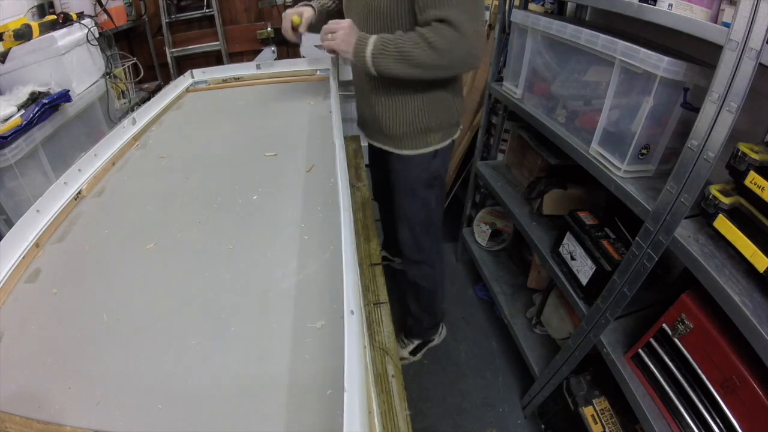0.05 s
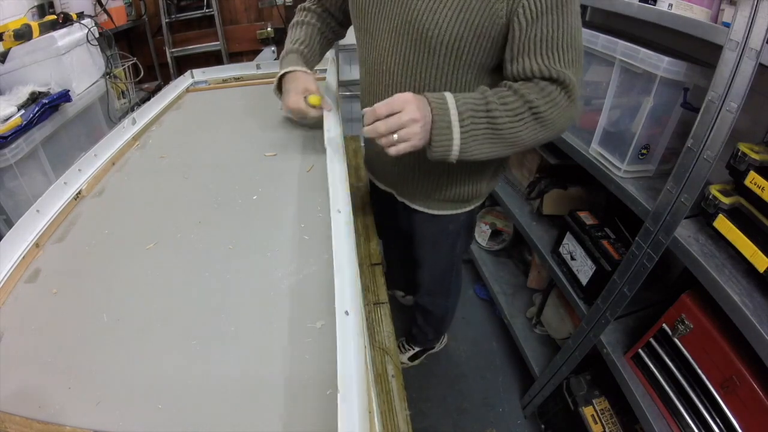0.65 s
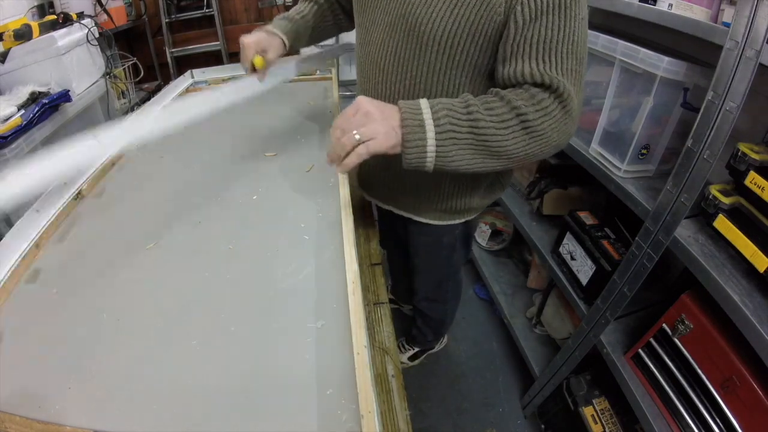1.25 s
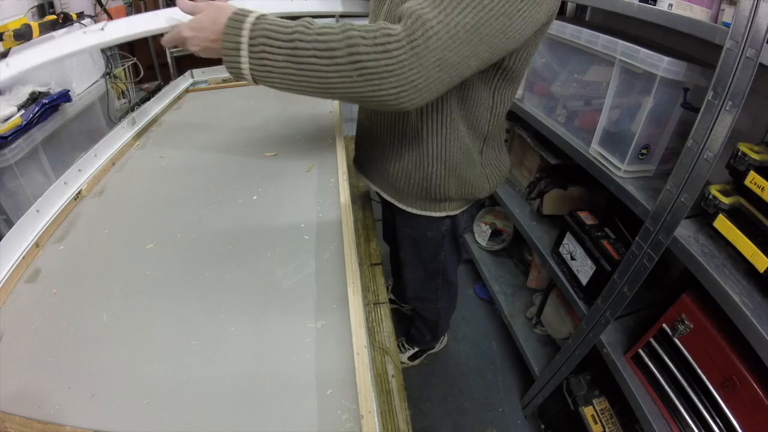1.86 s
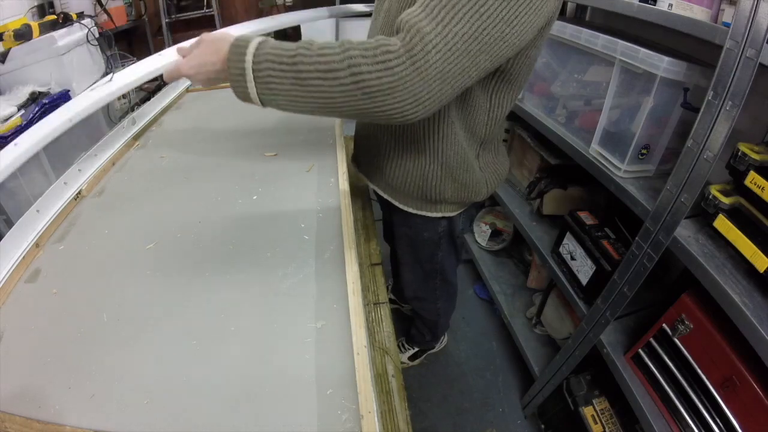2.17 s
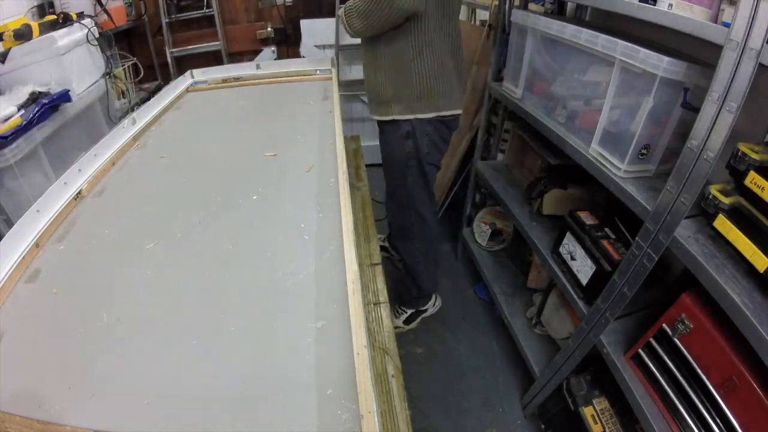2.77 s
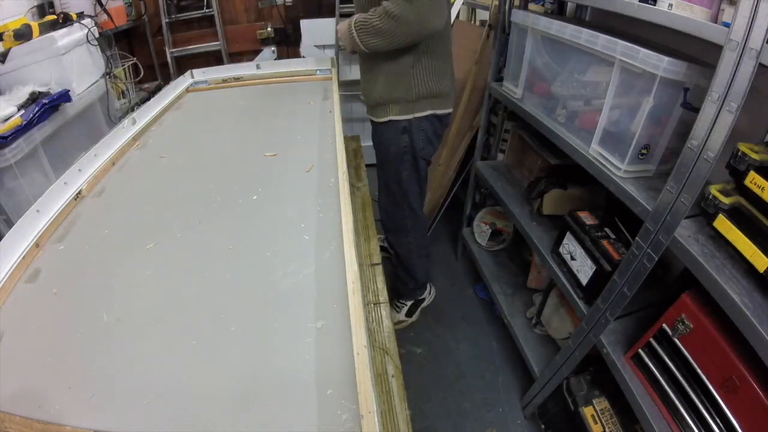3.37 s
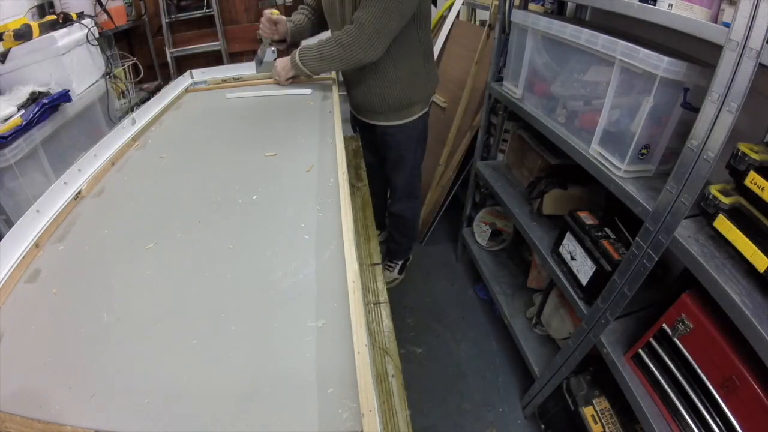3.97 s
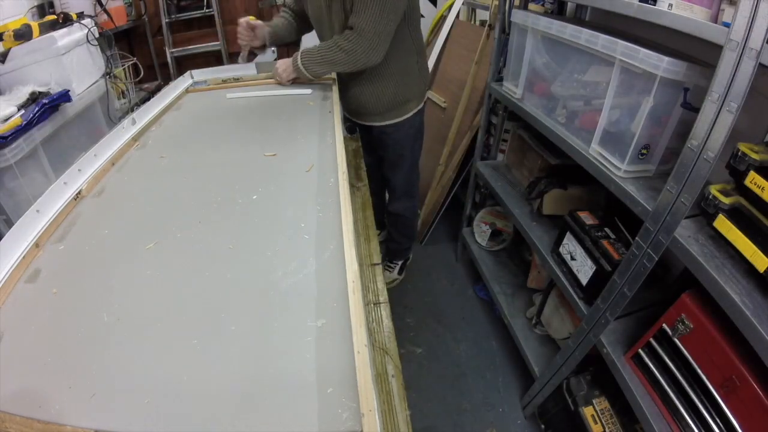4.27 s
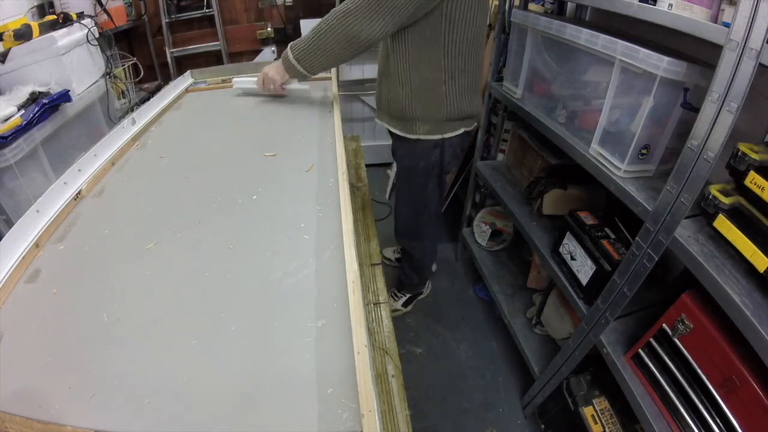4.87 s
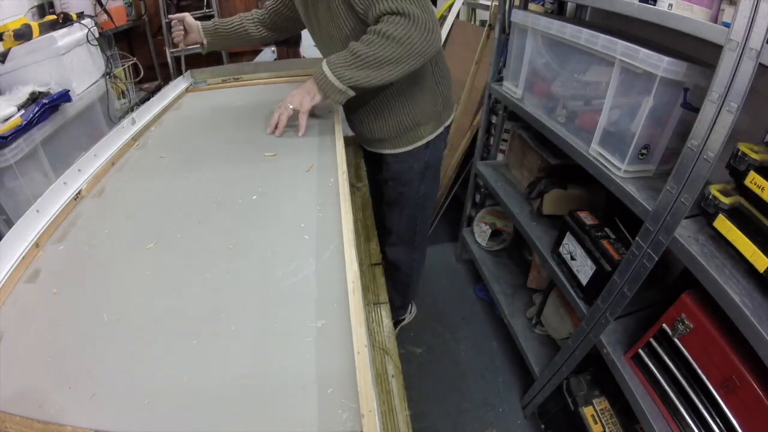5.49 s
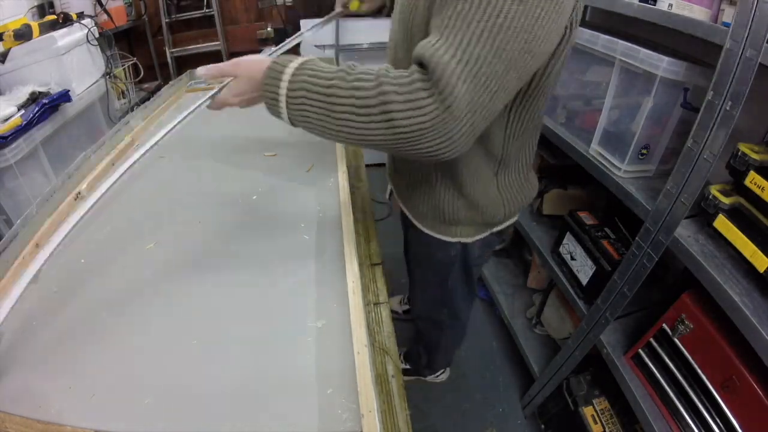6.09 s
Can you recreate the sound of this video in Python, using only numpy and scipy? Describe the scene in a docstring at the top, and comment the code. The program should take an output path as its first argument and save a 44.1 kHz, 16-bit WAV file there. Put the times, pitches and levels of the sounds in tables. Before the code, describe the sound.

A wooden strip is levered off a fibreglass panel in a small workshop, heard at one microphone over a low room rumble. Three light cracks come in the first quarter second. From about 0.3 seconds the strip scrapes over the panel with a grainy, swelling hiss. Between 0.8 and 1.4 seconds the bond gives way in a rapid run of splintering cracks, the loudest part, briefly ringing the panel, wood and room. Only the rumble remains until about 2.3 seconds, when it abruptly thins to near silence. From 2.7 seconds the tool work sounds sped up: faint, high, irregular ticks and very soft rubs. A few tiny squeaks come around 3.6 seconds. The ticks are busiest from 3.7 to 4.9 seconds, over a barely audible hum, then thin out and cluster again from 5.7 to 6 seconds.

```python
"""A long wooden strip is levered and torn off a fibreglass panel, heard at one microphone in a small workshop.
The strip scrapes over the laminate, then the bond gives way in bursts of tiny slips that ring the panel,
the freed wood and the room. From 2.25 s the scene runs five times as fast: the room's rumble thins, and
further tool work on the same panel becomes faint, high ticks, rubs and squeaks."""
import sys
import numpy as np
from scipy import signal
from scipy.fft import rfft, irfft
from scipy.io import wavfile

SR = 44100
rng = np.random.default_rng(int(sys.argv[2]) if len(sys.argv) > 2 else 0)


def log_audio(samples):
    """Write samples as a 16-bit WAV file to the path given in sys.argv[1]."""
    # one column per channel
    frames = np.atleast_2d(samples).T
    # limit to full scale, then quantise
    limited = np.clip(frames, -1, 1)
    pcm = np.round(limited * 32767).astype(np.int16)
    wavfile.write(sys.argv[1], SR, pcm)


N = 275184
TIME, BLOW_TIME = np.arange(N) / SR, np.arange(2 ** 14) / SR
SPEED, FAST_FROM_S = 5, 2.252

# Workshop air at normal and at high speed. Each row: frequency in Hz, relative density in dB.
AIR_SPECTRUM = [(15, -25), (25, -6.5), (71, -6), (142, -10), (172, -7.5), (264, -5.5), (309, -1.5),
                (383, -13), (427, -7.5), (558, -16.5), (790, -13.5), (952, -20), (1960, -24.5), (6720, -37),
                (15000, -50)]
FAST_AIR_SPECTRUM = [(35, -50), (60, -18.5), (117, -8.5), (199, -13.5), (295, -6.5), (339, -8.5),
                     (663, -11), (895, -12.5), (1240, -12.5), (1330, -5), (2010, -12.5), (3190, -19),
                     (3420, -13.5), (3660, -19.5), (15000, -34)]
# The room's standing waves, before room_air scales their pitch.
# Each row: frequency in Hz, width in Hz, relative level in dB.
STANDING_WAVES = [(62, 10, -11.5), (228.2, 14, -8), (291.3, 60, -9), (314.2, 18, -8.5)]
# Strokes of the tool over the panel. Each row: time of the peak in seconds, level in dB.
RUB_STROKES = [(3.04, -68), (3.51, -80), (3.72, -66), (4.05, -75), (4.63, -66), (4.85, -74), (5.11, -71.5),
               (5.47, -77), (5.85, -66)]
# Hiss of the tool and of the strip. Each row: frequency in Hz, relative density in dB.
RUB_SPECTRUM = [(200, -21), (520, -22), (720, 6), (1300, 6.5), (2500, 3.5), (4500, -16), (9000, -7),
                (15000, -24.5)]
SLIDE_SPECTRUM = [(300, 13), (700, 8), (2000, 1.5), (4000, -2), (6700, -2.5), (9000, -5), (12000, -13.5),
                  (15500, -30)]
# Lever creaks at high speed. Each row: start in seconds, length in seconds, first pitch in Hz,
# last pitch in Hz, strongest frequency in Hz, direct level in dB.
LEVER_CREAKS = [(3.555, 0.021, 1214, 1140, 1100, -62), (3.568, 0.024, 1026, 770, 3050, -58.5),
                (3.579, 0.011, 722, 654, 2240, -52), (3.619, 0.015, 668, 636, 2520, -52),
                (3.684, 0.051, 574, 606, 2800, -57.5)]
# Panel and strip at normal speed. Each row: frequency in Hz, relative level in dB, t60 in seconds.
PANEL_MODES = [(67.8, -9, 0.24), (148.1, -8.5, 0.36), (206.3, -6, .3), (254.7, 3, 0.25), (376.7, -3, 0.12),
               (419.6, -1.5, 0.24), (453.3, -3, 0.1588), (510, -14, 0.2362), (604, -9.5, 0.17),
               (654, -1.5, 0.19), (750, -14, 0.078), (823, -6.5, 0.22), (896, -10.5, .18), (958, -7, 0.25),
               (1040, -10.5, .2), (1166, -37.5, 0.1792), (1432, -13, 0.1), (2024, -21.5, 0.3)]
# Modes too crowded to tell apart, at normal speed. Each row: frequency in Hz, relative density in dB.
CRACK_SPECTRUM = [(60, -14.5), (130, -10), (240, 7.5), (420, -6), (620, 3), (1000, -3), (1600, -8.5),
                  (3000, -11.5), (6800, -15), (10000, -20.5), (15000, -33.5)]
# Tool knocks at high speed. Each row: start in seconds, length in seconds, level in dB,
# hardness in dB (treble up and bass down by this much).
KNOCKS = [(2.71, 0.02, -67, 10), (2.777, .002, -54.5, -2), (2.942, .005, -63, 7), (3.004, .0045, -59, -6.5),
          (3.116, 0.016, -57.5, -3), (3.138, 0.0072, -61.5, -8.5), (3.191, 0.017, -59.5, -5),
          (3.246, .007, -67, -3.5), (3.488, 0.0074, -72.5, -9), (3.515, 0.0094, -71.5, -9),
          (3.676, 0.0027, -48.5, 6.5), (3.733, 0.014, -55.5, 3), (3.7538, 0.0024, -57, -13.5),
          (3.77, 0.0056, -46.5, 6.5), (3.8575, 0.0032, -37.5, 0), (3.878, 0.024, -50, -1),
          (3.921, .0055, -49, 2), (3.989, 0.017, -51.5, -3), (4.019, 0.0053, -51.5, -1),
          (4.035, 0.0058, -57, -5.5), (4.055, 0.016, -49, 0), (4.173, 0.0041, -66, -3),
          (4.215, 0.0026, -52, 1.5), (4.268, 0.0031, -48.5, 3.5), (4.278, 0.0075, -42, -7),
          (4.315, 0.0086, -55.5, 7), (4.333, 0.0012, -50.5, 10.5), (4.464, 0.0081, -63, 4.5),
          (4.4988, .001, -55.5, 8.5), (4.592, 0.0072, -43.5, 3.5), (4.61, 0.01, -52, -2),
          (4.638, 0.022, -54, 0), (4.716, 0.0043, -58, -10), (4.722, 0.02, -55, 3),
          (4.812, 0.012, -50.5, 4.5), (4.83, 0.011, -57, 5), (4.877, 0.0036, -61, 4.5),
          (4.943, 0.0089, -70.5, 12.5), (5.123, 0.011, -55, 8), (5.168, 0.014, -63.5, 4.5),
          (5.404, .003, -72, 4), (5.689, 0.0059, -53, -10), (5.709, 0.005, -54, 4.5),
          (5.731, .0052, -56, -7.5), (5.744, .0059, -48.5, -1.5), (5.795, 0.0022, -43, 7.5),
          (5.819, 0.0085, -48, -5.5), (5.834, 0.0053, -45, 3), (5.867, 0.012, -53, -2.5),
          (6.027, 0.0067, -45.5, 0.5)]
# Spells of handling loose wood. Each row: start in seconds, end in seconds.
LOOSE_WOOD_S = [(2.3, 3.5), (5.0, 5.3), (5.95, 6.2)]
# Band edges of boom, clack and splinter in Hz, at normal speed.
KNOCK_EDGES_HZ = [135, 450, 930, 2700]
BURST_EDGES_HZ = [65, 500, 2150, 17000]
# The strip slides along the edge. Each row: time in seconds, hiss level in dB.
SLIDE_LEVELS = [(0.3, -65), (0.382, -72), (0.41, -49), (0.528, -60), (0.544, -54), (0.602, -54),
                (0.67, -43), (0.766, -46.5), (0.83, -41)]
# The bond gives way. Each row: start in seconds, length in seconds, clack level in dB,
# splinter level in dB, ring of the freed wood in Hz.
BOND_BURSTS = [(0.0, 0.0058, -42.5, -58, 350), (.117, 0.0041, -48.5, -57, 740),
               (0.231, 0.0096, -49.5, -49, 1920), (.827, 0.0038, -38.5, -51, 890),
               (0.839, .024, -29, -47.5, 251.6), (.857, .024, -24.5, -52, 655.4),
               (.892, .045, -34.5, -51, 606), (.96, 0.0093, -43, -73.5, 229),
               (1.022, 0.035, -31, -47.5, 970), (1.041, 0.026, -25.5, -39.5, 837),
               (1.085, 0.034, -35, -45, 680), (1.114, 0.035, -28, -33.5, 1110),
               (1.146, 0.0068, -24.5, -51, 413), (1.166, 0.01, -25, -39.5, 410),
               (1.182, 0.027, -22.5, -36, 477), (1.201, .012, -24, -44.5, 592),
               (1.211, 0.01, -26, -42, 1520), (1.229, 0.0035, -39, -33, 408),
               (1.277, 0.0048, -29.5, -72, 520), (1.375, 0.0099, -29.5, -57.5, 824)]


def from_db(db):
    """Decibels to gain."""
    return 10 ** (np.asarray(db) / 20)


def rms_one(x):
    """Scale to rms 1."""
    return x / np.sqrt(np.mean(x ** 2) + 1e-20)


def noise(spectrum, size):
    """Noise of a given colour, rms 1."""
    hz, db = np.transpose(spectrum)
    bins = np.maximum(np.fft.rfftfreq(size, 1 / SR), 1)
    gain = from_db(np.interp(np.log(bins), np.log(hz), db))
    return rms_one(irfft(rfft(rng.standard_normal(size)) * gain, size))


def drift(corner_hz):
    """A slow random wander, rms about 1."""
    pole = np.exp(-40 * np.pi * corner_hz / SR)   # one step every 20 samples
    slow = signal.lfilter([1], [1, -2 * pole, pole * pole], rng.standard_normal(N // 20 + 2002))[2000:]
    return np.interp(np.arange(N) / 20, np.arange(len(slow)), rms_one(slow))


def steep_band(low_hz, high_hz):
    """Sections of a steep band-pass."""
    return signal.butter(3, [low_hz, high_hz], "band", fs=SR, output="sos")


def resonance(x, hz, width_hz):
    """One resonance, gain 1 at its top."""
    radius = np.exp(-np.pi * width_hz / SR)
    feedback = [1, -2 * radius * np.cos(2 * np.pi * hz / SR), radius ** 2]
    return signal.lfilter(np.array([1, 0, -1]) * (1 - radius ** 2) / 2, feedback, x)


def dying(t60):
    """Envelope that falls 60 dB in t60 seconds."""
    return np.exp(-np.log(1000) * BLOW_TIME / t60)


def add(out, start_s, sound):
    """Mix a sound in at a time."""
    at = max(round(start_s * SR), 0)
    out[at:at + len(sound)] += sound[:len(out) - at]


def room_air(spectrum, pitch_ratio):
    """Broad rumble with the room's standing waves on top, rms 1."""
    white = rng.standard_normal(N)
    standing = sum(from_db(db) * rms_one(resonance(white, hz * pitch_ratio, width * pitch_ratio))
                   for hz, width, db in STANDING_WAVES)
    standing = signal.sosfilt(steep_band(45 * pitch_ratio, 420 * pitch_ratio), standing)
    return rms_one(noise(spectrum, N) + standing)


def room_tone(fade_db_per_s=.4):
    """Rumble around the microphone; at high speed it is thin and faint, and a hum comes and goes."""
    rumble = room_air(AIR_SPECTRUM, 0.97) * from_db(-46.5 - fade_db_per_s * TIME + 1.32 * drift(12))
    thin = room_air(FAST_AIR_SPECTRUM, SPEED) * from_db(-69)
    hum = from_db(-75 + 1.5 * drift(9.3)) * np.sin(2 * np.pi * 188.4 * TIME)
    hum *= np.interp(TIME, [3.45, 3.9, 4.6, 5.0], [0, 1, 1, 0])
    fast = np.clip((TIME - FAST_FROM_S) / 0.0041 + .5, 0, 1)
    return (1 - fast) * rumble + fast * (thin + hum)


def tool_rubbing(rough_db=3.5, rise_db_per_s=106, fall_db_per_s=97):
    """The tool rubs over the panel; each stroke swells, then fades a little more slowly."""
    strokes = sum(from_db(db - np.maximum(rise_db_per_s * (peak - TIME), fall_db_per_s * (TIME - peak)))
                  for peak, db in RUB_STROKES)
    return strokes * from_db(rough_db * drift(100)) * noise(RUB_SPECTRUM, N)


def lever_creaks(width_octaves=0.97, top_hz=5600):
    """The lever sticks and slips evenly on the wood: short harmonic squeaks that ring on in the room."""
    out, orders = np.zeros(N), np.arange(1, 10)[:, None]
    waver = 1 + .006 * drift(150)
    for start, length, first_hz, last_hz, strongest_hz, db in LEVER_CREAKS:
        along = np.linspace(0, 1, round(length * SR))
        hz = (first_hz + (last_hz - first_hz) * along) * waver[:len(along)]
        weights = np.exp(-(np.log2(orders * hz / strongest_hz) / width_octaves) ** 2)
        weights /= 1 + (orders * hz / top_hz) ** 12
        tone = (weights * np.sin(2 * np.pi * orders * np.cumsum(hz) / SR)).sum(0)
        add(out, start, from_db(db) * rms_one(tone) * np.sin(np.pi * along))
    room_tail = rng.standard_normal(len(BLOW_TIME)) * dying(t60=0.048)
    return out + from_db(1) * signal.fftconvolve(out, room_tail / np.linalg.norm(room_tail))[:N]


def panel_modes():
    """One decaying sine for each mode of the panel."""
    return np.array([from_db(db) * dying(t60) * np.sin(2 * np.pi * hz * BLOW_TIME)
                     for hz, db, t60 in PANEL_MODES])


def panel_response(modes, modes_db, crack_t60, room_t60, room_db):
    """One slip at the microphone: the main modes, a short crack of crowded modes, the room's tail."""
    strengths = rng.choice([-1, 1], len(modes)) * rng.uniform(.6, 1.4, len(modes))
    decay = dying(crack_t60) + from_db(room_db) * dying(room_t60)
    diffuse = noise(CRACK_SPECTRUM, len(BLOW_TIME)) * decay
    return from_db(modes_db) * rms_one(strengths @ modes) + rms_one(diffuse)


def slips(length_s, per_s, snap, brittle_s, swell_share):
    """Force of a fracture: uneven slips swell and stop; a short, brittle break starts with a snap."""
    size = len(BLOW_TIME) // 2
    along = np.minimum(BLOW_TIME[:size] / length_s, 2)
    force = (rng.random(size) < per_s / SR) * rng.standard_normal(size)
    force *= (1 - np.exp(-along / swell_share)) * np.exp(-along ** 4)
    force[0] = snap / (1 + (length_s / brittle_s) ** 2)
    return force


def blow(force, response, edges_hz, levels_db):
    """Slips sound through the panel; each band gets its own level, as energy spread over 50 ms."""
    sound = signal.fftconvolve(force, response)[:len(response)]
    bands = np.array([signal.sosfilt(steep_band(low, high), sound)
                      for low, high in zip(edges_hz, edges_hz[1:])])
    gains = from_db(levels_db) / np.linalg.norm(bands, axis=1) * np.sqrt(SR / 20)
    return gains @ bands


def spot_ring_hz(at_s, hard_db, loose_hz=790, wood_hz=1263, blade_hz=4730, full_hard_db=7):
    """Pitch heard from the struck spot: loose wood is low; harder knocks go from wood to blade."""
    if any(start < at_s < end for start, end in LOOSE_WOOD_S):
        return loose_hz
    return wood_hz * (blade_hz / wood_hz) ** np.clip(hard_db / full_hard_db, 0, 1)


def tool_knocks(modes, settle_s=0.005, settle_db=-72):
    """The tool knocks the panel, thuds the bench and settles with a tick, all sped up by SPEED."""
    normal_speed = np.zeros(N * SPEED)
    edges_hz = [22, *KNOCK_EDGES_HZ]   # the lowest band is the bench's thud
    for start, length, db, hard_db in KNOCKS:
        clack_db = -0.2 + 0.3 * min(hard_db, 0)   # soft knocks lose clack
        colour_db = np.array([-17 - hard_db, -hard_db, clack_db, -8.5 + hard_db])
        response = panel_response(modes, modes_db=-5, crack_t60=0.06, room_t60=0.3, room_db=-4)
        response += from_db(5.5) * resonance(response, spot_ring_hz(start, hard_db) / SPEED, width_hz=66)
        settle_delay = rng.uniform(0.015, .05)
        for delay, lasts, level_db in (0, length, db), (settle_delay, settle_s, settle_db):
            force = slips(lasts * SPEED, per_s=590, snap=7.6, brittle_s=0.028, swell_share=0.07)
            knock = blow(force, response, edges_hz, level_db + colour_db)
            add(normal_speed, (start + delay) * SPEED, knock)
    return signal.resample_poly(normal_speed, 1, SPEED)


def strip_sliding(rough_db=1.0, fade_s=0.047):
    """Wood rubs over the laminate in a grainy hiss that dies once the strip lifts."""
    times, db = np.transpose(SLIDE_LEVELS)
    contact = np.interp(TIME, [times[0], times[1], times[-1], times[-1] + fade_s], [0, 1, 1, 0])
    level_db = np.interp(TIME, times, db) + rough_db * drift(120)
    return contact * from_db(level_db) * noise(SLIDE_SPECTRUM, N)


def strip_tearing(modes, even_ring_hz=500, clean_snap_s=0.008):
    """The bond breaks in bursts; the freed length of wood lends each its own ring."""
    out = np.zeros(N)
    for start, length, clack_db, splinter_db, wood_hz in BOND_BURSTS:
        response = panel_response(modes, modes_db=-2.5, crack_t60=.035, room_t60=.25, room_db=-2)
        response += from_db(5.5) * resonance(response, wood_hz, width_hz=83)
        force = slips(length, per_s=2500, snap=5.3, brittle_s=0.013, swell_share=0.097)
        boom_db = clack_db + 2 * np.log2(even_ring_hz / wood_hz)   # lower wood booms more
        boom_db -= 1.53 * np.log2(length / clean_snap_s)   # a longer tear booms less
        add(out, start, blow(force, response, BURST_EDGES_HZ, [boom_db, clack_db, splinter_db]))
    return out


def scene():
    """Strip, tool and workshop at one microphone."""
    modes = panel_modes()
    strip = strip_tearing(modes) + strip_sliding()
    tool = tool_knocks(modes) + tool_rubbing() + lever_creaks()
    return (strip + tool + room_tone())[None]


def record(dry):
    """The microphone's signal is cut steeply above 15450 Hz."""
    return signal.sosfilt(signal.ellip(10, .1, 80, 15450, fs=SR, output="sos"), dry)


dry = scene()
out = record(dry)
log_audio(out)
```